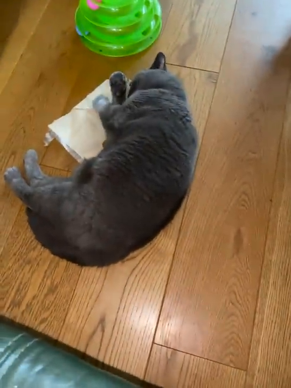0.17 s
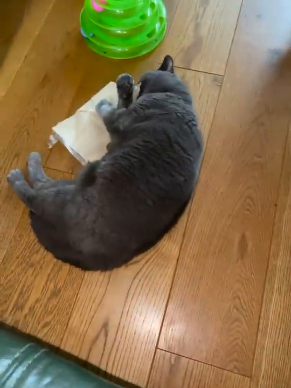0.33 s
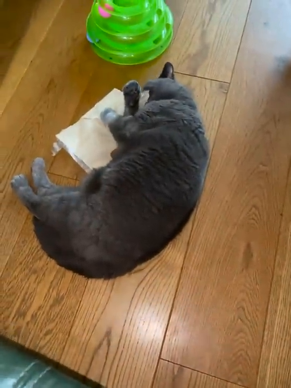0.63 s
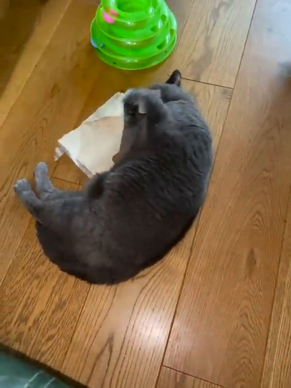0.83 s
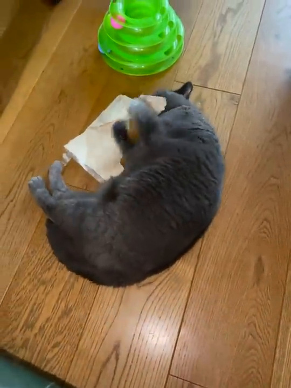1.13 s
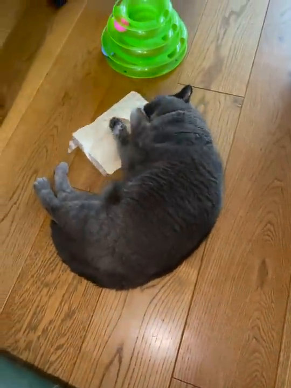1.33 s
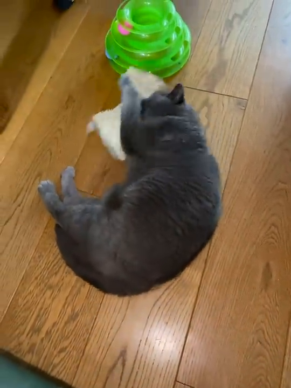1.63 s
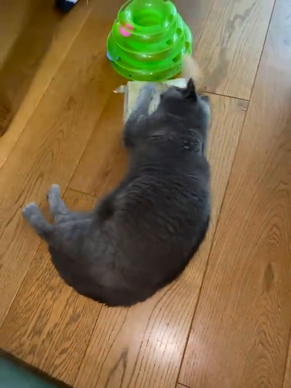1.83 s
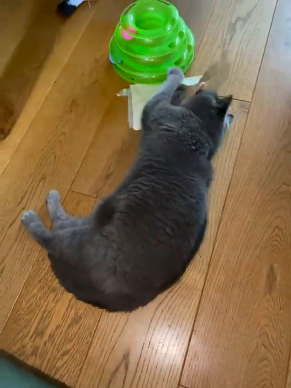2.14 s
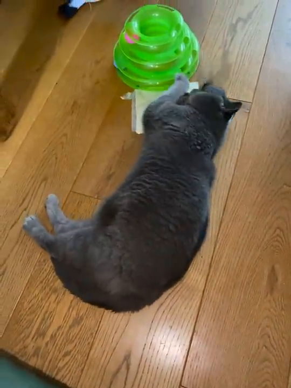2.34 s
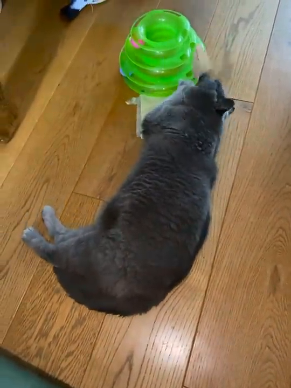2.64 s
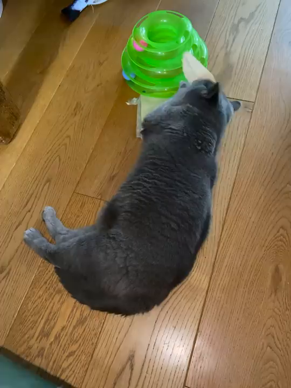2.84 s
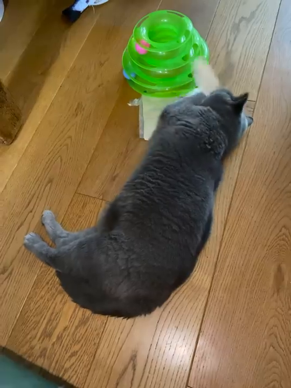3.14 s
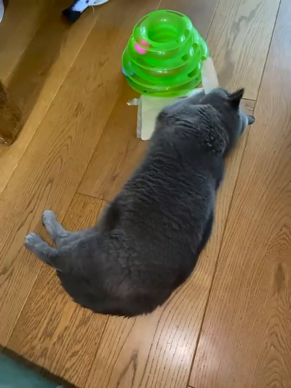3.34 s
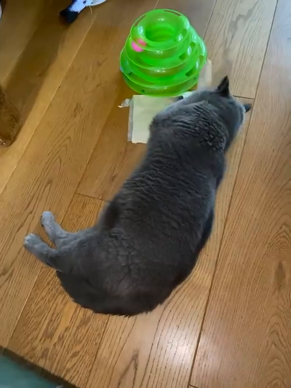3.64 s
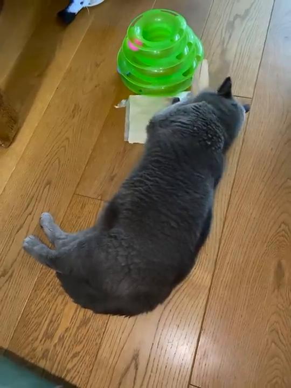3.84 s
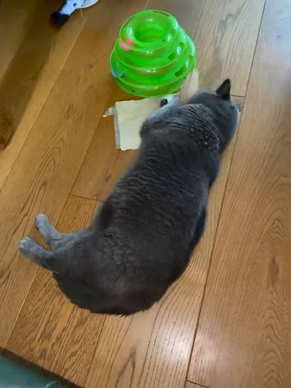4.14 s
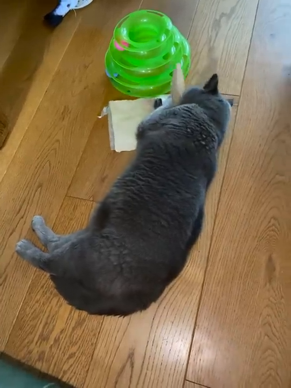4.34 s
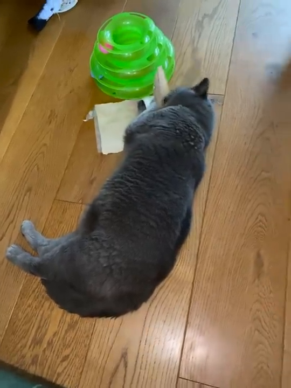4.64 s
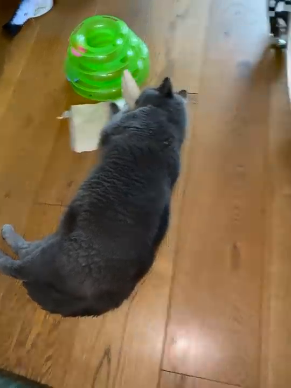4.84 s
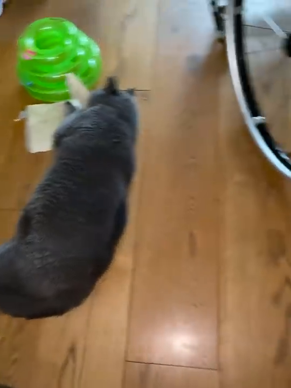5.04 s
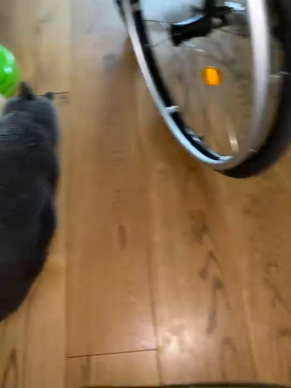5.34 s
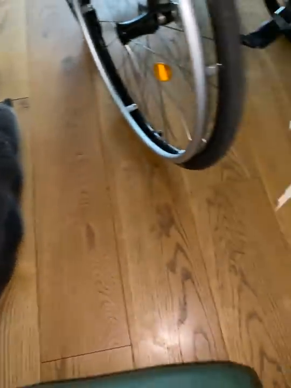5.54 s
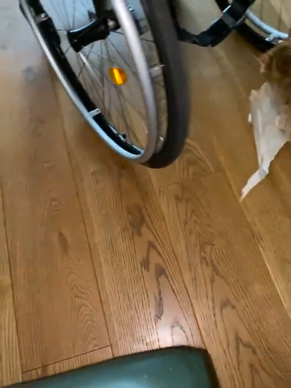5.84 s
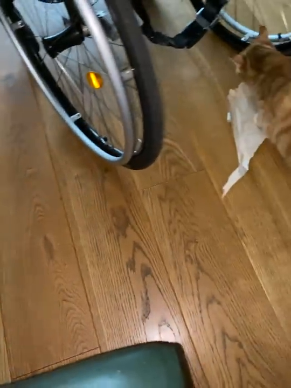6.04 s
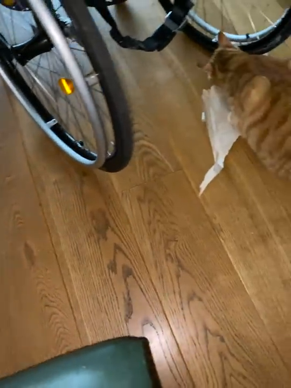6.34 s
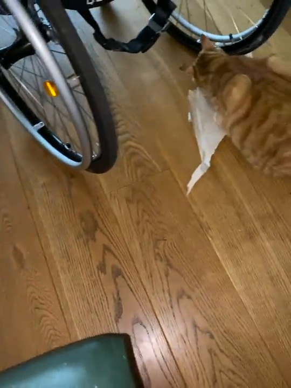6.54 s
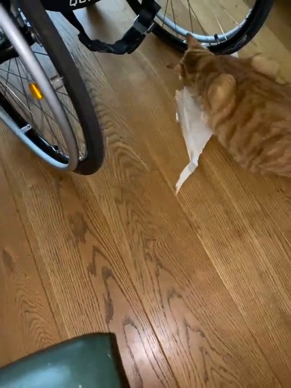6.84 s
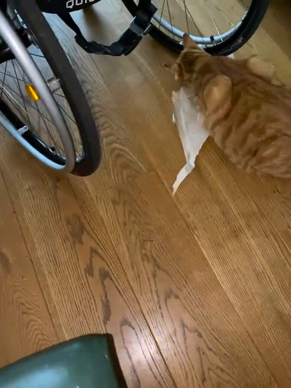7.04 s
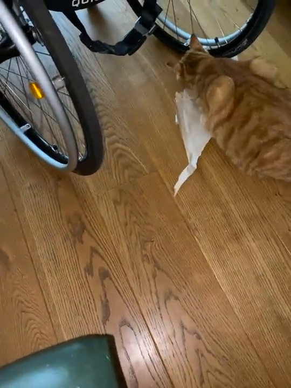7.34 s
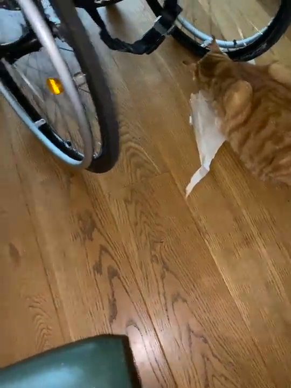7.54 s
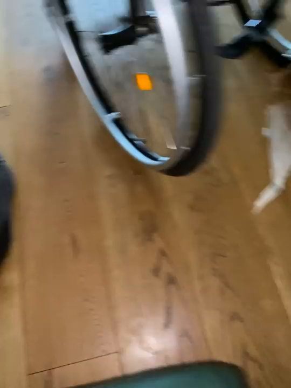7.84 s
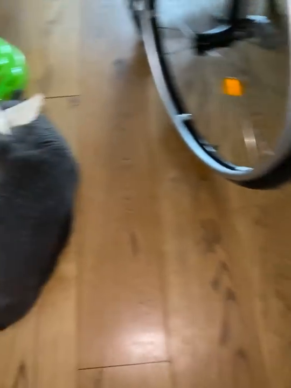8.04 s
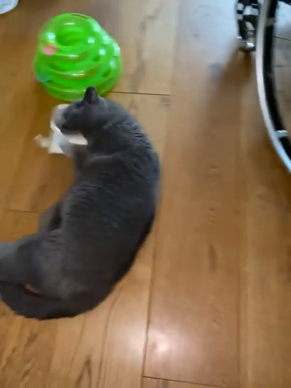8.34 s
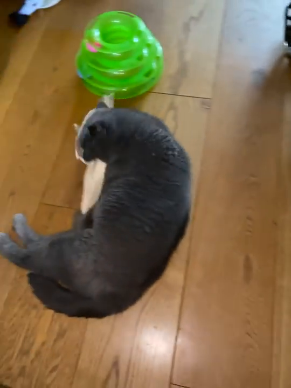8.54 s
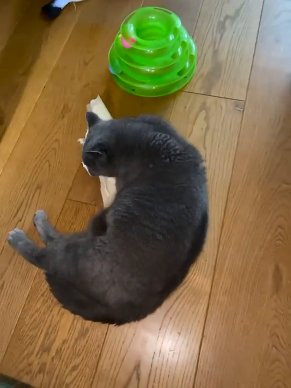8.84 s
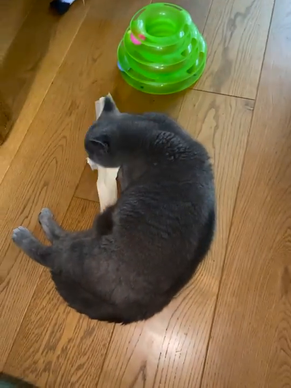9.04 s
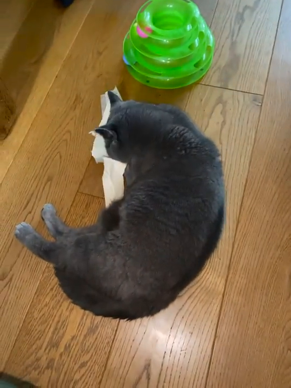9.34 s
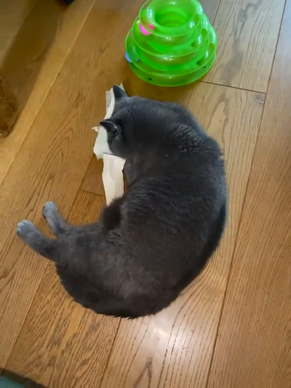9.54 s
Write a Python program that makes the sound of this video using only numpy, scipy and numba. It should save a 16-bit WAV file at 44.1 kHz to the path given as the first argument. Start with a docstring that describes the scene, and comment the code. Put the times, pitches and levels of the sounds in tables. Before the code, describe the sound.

A small, quiet furnished room with faint hiss, low hum and a barely audible high whine, heard by a phone near a cat playing with a paper envelope on a wooden floor. From 0 to 1.7 seconds, light irregular crinkles and silky fur-on-paper scuffs come and go. Around 1.8 to 3.3 the pawing becomes vigorous: crisp snaps, strong near 2.05 and 2.5, with hollow papery thumps. Rustling and scattered pops continue until about 5.1. Then it nearly stops, leaving room hiss and a small crackle or two near 6. From 6.6 bursts return, with sharp folds and a knock at 6.8, more snaps around 7.2, and dense crumpling from 7.7 to the loudest crack at 7.9. Swishing rustles and soft low thumps follow to 8.7, with a brief deep handling rumble near 8.6. Sparse crinkles and a few clear snaps around 9.6 finish it, with short dry room reflections.

```python
"""On the wooden floor of a small furnished room, a cat paws and rolls on a paper envelope near a phone.
The sheet rustles as swells of random tiny creases ring its panels, and the fur slides with a treble sheen.
Single folds snap as damped plate modes, the air pocket under the paper rings hollow, and thumps excite
low damped rings. Echoes and a decaying noise tail answer the paper; filtered noise makes the quiet hum,
whine and hiss, and one brief deep rumble from the hand on the phone."""
import sys
import numpy as np
from scipy import signal
from scipy.fft import rfft, irfft, next_fast_len
from scipy.io import wavfile
from scipy.ndimage import uniform_filter1d
from numba import njit

SR = 44100
rng = np.random.default_rng(int(sys.argv[2]) if len(sys.argv) > 2 else 0)


def wrap_up_sound(samples):
    """Save the sound to the file named by the first command line argument, as 16-bit audio."""
    columns = np.atleast_2d(samples).T
    # keep every value between -1 and 1, then stretch to whole-number steps
    tamed = np.clip(columns, -1, 1)
    steps = np.round(tamed * 32767).astype(np.int16)
    wavfile.write(sys.argv[1], SR, steps)


N = 427769  # length in samples


def undb(db):
    """Logarithmic level: 20 dB is a factor of ten in amplitude."""
    return 10 ** (np.asarray(db) / 20)


def level(x, db):
    """Mean power: scale x to an rms level in dB."""
    return x * undb(db) / np.sqrt(np.mean(x ** 2))


def colour(x, points):
    """Spectral shaping: apply (Hz, dB) gains, interpolated over log frequency."""
    hz, db = np.transpose(points)
    size = next_fast_len(len(x))
    f = np.fft.rfftfreq(size, 1 / SR) + 1  # the extra 1 Hz avoids log(0)
    gain = undb(np.interp(np.log(f), np.log(hz), db))
    return irfft(rfft(x, size) * gain, size)[:len(x)]


def ring(x, hz, width_hz):
    """Simple resonance: a damped mode with gain 1 at its centre."""
    b, a = signal.iirpeak(min(hz, .45 * SR), hz / width_hz, SR)
    return signal.lfilter(b, a, x)


@njit
def sweep(x, hz, sharpness):
    """Time-varying resonance: a state-variable band-pass whose centre moves."""
    y, band, low = np.empty(len(x)), 0., 0.
    for i in range(len(x)):
        g = np.tan(np.pi * hz[i] / SR)
        v = (band + g * (x[i] - low)) / (1 + g * (g + 1 / sharpness))
        band, low, y[i] = 2 * v - band, low + 2 * g * v, v / sharpness
    return y


def walk(rate):
    """Slow random modulation: levels drawn rate times a second and slewed, spread near 1."""
    hold = int(SR / rate)
    steps = np.repeat(rng.standard_normal(N // hold + 1), hold)
    return np.sqrt(1.5) * uniform_filter1d(steps, hold)[:N]


def curve(table):
    """Linear interpolation: columns of a (s, value, ..) table, sample by sample."""
    s, *columns = np.transpose(table)
    return [np.interp(np.arange(N) / SR, s, c) for c in columns]


def add(out, s, x):
    """Superposition: mix x in at time s."""
    i = int(s * SR)
    out[i:i + len(x)] += x[:N - i]


# Spectrum of the still air. Each row: frequency in Hz, relative density in dB per Hz.
AIR = [(15, -49), (28, -27), (80, 1.5), (149, 1.5), (229, 4), (863, 1), (3080, -11), (6050, -5),
       (13200, -18), (16000, -32)]
AIR_DB = -65.5  # rms of the shaped noise
# Hum and high whine. Each row: centre in Hz, width of each of two filter passes in Hz, level in dB rms.
HUM = [(99.3, 4.4, -77.5), (13400, 30, -86)]


def air():
    """Broadband and narrow-band noise: rumble and hiss flicker by octave; hum and whine waver."""
    white = np.zeros(N)
    for hz in 30 * 2. ** np.arange(10):
        octave = ring(rng.standard_normal(N), hz, 0.94 * hz) / np.sqrt(hz)
        white += undb(0.94 * walk(6)) * octave  # flicker spread in dB
    tones = np.zeros(N)
    for hz, width_hz, db in HUM:
        narrow = ring(ring(rng.standard_normal(N), hz, width_hz), hz, width_hz)
        tones += level(narrow, db)
    return level(colour(white, AIR), AIR_DB) + tones


# The hand on the phone. One row: peak in seconds, half length in seconds, centre in Hz,
# level in dB rms before the swell.
HAND = (8.6, .3, 90, -60)


def phone_hand():
    """Handling noise: turning the phone makes a deep noise band under a Gaussian swell."""
    s, length, hz, db = HAND
    swell = np.exp(-((np.arange(N) / SR - s) / length) ** 2)
    return swell * level(ring(rng.standard_normal(N), hz, .8 * hz), db)


# Floor and furniture reflections. Each row: delay in seconds, peak in dB re a tail of unit energy.
ECHOES = [(.0017, -10), (0.0122, -16), (0.0206, -19)]
# Reverberation time. Each row: frequency in Hz, time to fall 60 dB in seconds.
ROOM_T60 = [(200, 0.19), (1400, 0.16), (4000, 0.19), (10000, 0.11)]


def room():
    """Reverberation: discrete near echoes, then a diffuse tail that dies band by band."""
    t = np.arange(SR // 2) / SR
    hz, t60 = np.transpose(ROOM_T60)
    tail = np.zeros(len(t))
    for f in 125 * 2. ** np.arange(8):
        decay = 1000. ** (-t / np.interp(np.log(f), np.log(hz), t60))
        tail += ring(rng.standard_normal(len(t)), f, f) / np.sqrt(f) * decay
    # a quick onset, then slightly stronger early sound from near surfaces
    tail *= (1 - np.exp(-t / 0.00038)) * (1 + 0.2 * np.exp(-t / 0.079))
    out = tail / np.sqrt(np.sum(tail ** 2))
    for s, db in ECHOES:
        out[int(s * SR)] += undb(db)
    return out


# Modes of the trapped air. Each row: centre in Hz, width in Hz (each of two passes is twice as wide),
# gain in dB.
POCKET = [(535, 95, 0), (800, 350, -12)]


def pocket(x):
    """Cavity resonance: the air trapped under the envelope rings hollow."""
    return sum(undb(db) * ring(ring(x, hz, 2 * w), hz, 2 * w) for hz, w, db in POCKET)


# Body and paws landing on the boards or the puffed envelope.
# Each row: start in seconds, peak in dB, pitch in Hz.
THUMPS = [(1.04, -47, 170), (1.085, -50, 930), (1.83, -45, 420), (2.058, -27, 552), (2.214, -46, 334),
          (2.374, -39.5, 549), (2.814, -39, 550), (3.13, -35.5, 380), (5.07, -40.5, 468), (6.795, -38, 520),
          (6.806, -31, 511), (7.15, -42, 450), (8.125, -48.5, 260), (8.185, -43, 330), (8.305, -41, 400),
          (8.43, -43.5, 423), (8.545, -45, 200), (8.704, -38, 235), (8.734, -37, 229)]


def thumps():
    """Impact excitation: a soft half-cycle push drives a damped low ring and the pocket."""
    out, t = np.zeros(N), np.arange(SR // 8) / SR
    for s, peak_db, hz in THUMPS:
        push = np.sin(2 * np.pi * hz * t) * (t < .5 / hz)
        push += .4 * rng.standard_normal(len(t)) * np.exp(-t / .02)  # weight settles raggedly
        boards = ring(ring(push, hz, .6 * hz), hz, 0.76 * hz)
        knock = boards + 1.27 * pocket(push)
        add(out, s, undb(peak_db) * knock / np.abs(knock).max())
    return out


# Folds that snap. Each row: start in seconds, peak of the panel ring in dB, panel pitch in Hz,
# crack in dB re that peak, share sent to the room in dB re the direct sound.
SNAPS = [(0.117, -33, 2900, -45, -1), (0.137, -31, 3000, -35, -8), (0.488, -40, 4800, -35, -8),
         (0.622, -41, 4800, -31, -0.5), (1.754, -33, 3140, -21, -18), (1.83, -23, 3260, -25, -7.5),
         (1.912, -27.5, 4930, -33, -18), (2.058, -17, 1500, -24, 1), (2.216, -39, 2110, -30, 3.5),
         (2.338, -27.5, 2510, -23, -1), (2.371, -32.5, 2070, -22, 3.5), (2.453, -52, 2790, 7, -10),
         (2.485, -16, 3400, -15, -1), (2.814, -24, 2800, -20, 0), (2.89, -33, 1430, -34, -8),
         (2.959, -29, 2200, -27, 5), (3.074, -19.5, 3870, -26, -10), (3.117, -26, 2430, -32, 8),
         (3.139, -20, 2500, -34, -1), (3.277, -32, 3330, -33, -10), (3.527, -22.5, 3400, -22, -2.5),
         (3.667, -36, 2600, -30, -5), (3.9, -38, 2400, -30, -8), (4.005, -25, 3220, -36, -5),
         (4.103, -30, 1850, -30, -0.5), (4.374, -35, 1540, -18, -3), (4.422, -33, 1380, -9, -3),
         (4.852, -35, 2600, -22, -5), (5.073, -41.5, 1940, -23, 2), (5.928, -27.5, 3700, -45, 0),
         (6.045, -38, 1510, -26, -4), (6.795, -32, 3600, -8, -5), (6.808, -21, 3000, -16, -3),
         (6.887, -34, 1800, -32, -6), (7.128, -27, 3000, -20, 7), (7.181, -20.5, 4730, -19.5, -2),
         (7.188, -23.5, 4700, -27, 4), (7.23, -32.5, 1220, -23, -4.5), (7.497, -40.5, 2140, -32, 3.5),
         (7.611, -31, 1700, -25, -3), (7.651, -32, 1610, -23, 1), (7.737, -25, 1380, -49, -26),
         (7.755, -25, 1800, -43, -21), (7.81, -32, 1000, -9, -2.5), (7.845, -27, 2200, -29, -2),
         (7.921, -9.5, 3000, -13, -8), (8.053, -37, 3400, -20, -12), (8.065, -30, 2200, -40, -8),
         (8.181, -17.5, 2730, -32, -7), (8.309, -27, 1700, -25, -8.5), (8.505, -23, 2600, -35, -12.5),
         (8.568, -33.5, 1160, -27, 1), (8.575, -36, 2960, -1, 3), (8.587, -22.5, 3360, -37, 5),
         (8.62, -22, 2620, -42, -1), (8.861, -32, 1000, -34, -13), (9.258, -35, 1480, -28, -7.5),
         (9.402, -38.5, 2900, -23, 4), (9.609, -19.5, 2900, -36, -3.5), (9.687, -26, 1200, -39, -6)]
# Modes of a folded panel. Each row: multiple of panel pitch (before random detuning),
# width as a share of panel pitch, gain in dB.
FOLD_MODES = [(.5, .25, -8), (1, .45, 0), (1.5, .4, -7), (1.9, .5, -7)]
FOLD_POCKET_DB = -42.5  # pocket re the panel peak


def snaps():
    """Snap-through buckling: a flipping fold rings its panel, cracks in the treble and pumps the pocket.
    Row 0 reaches the phone, row 1 the room: a fold shielded by the cat is heard more through the walls."""
    out, t = np.zeros((2, N)), np.arange(SR // 16) / SR
    treble = signal.butter(2, 5000, "high", fs=SR, output="sos")
    for s, peak_db, hz, crack_db, room_db in SNAPS:
        burst = rng.standard_normal(len(t)) * (.25 * np.exp(-t / .0012) + .04 * np.exp(-t / .004))
        burst[0] = 2  # a clean flip, then a shudder
        panel = np.zeros(len(t))
        for ratio, share, db in FOLD_MODES:
            mode_hz = ratio * hz * (1 + .06 * rng.standard_normal())
            panel += undb(db) * ring(burst, mode_hz, share * hz)
        damping = signal.butter(2, min(2.39 * hz, 9000), fs=SR, output="sos")
        panel = signal.sosfilt(damping, panel)  # paper damps its upper modes
        short = slice(SR // 250)  # crack and pocket are rated by their first 4 ms
        crack, hollow = signal.sosfilt(treble, burst), pocket(burst)
        fold = panel / np.abs(panel).max()
        fold += undb(crack_db) * crack / crack[short].std()
        fold += undb(FOLD_POCKET_DB) * hollow / hollow[short].std()
        add(out[0], s, undb(peak_db) * fold)
        add(out[1], s, undb(peak_db + room_db) * fold)
    return out


def creases(rate, spread_db):
    """Random impulse process: tiny buckles, many faint and few strong, at slightly patchy strength."""
    chance = rng.random((N, 2)).T
    strength_db = np.minimum(-spread_db * np.log(1 - chance[1]), 12)
    size = undb(strength_db + 2.2 * walk(70))
    return (chance[0] < rate / SR) * size * rng.standard_normal(N)


# Strokes of paw or body on the paper. Each row: peak in seconds, creasing's rise in seconds per 10 dB,
# its fall in seconds per 10 dB, creasing in dB, panel band in Hz, fur sliding in dB.
STROKES = [(0.0, .01, .045, -58, 2460, -77), (.11, .004, .07, -45, 3100, -64),
           (.27, .05, .06, -64, 3400, -62), (.37, .01, .07, -48, 3400, -50),
           (.55, .15, .04, -56, 4000, -56), (.63, .03, .04, -57, 4100, -65),
           (1.09, .07, .08, -56, 3300, -58), (1.21, .12, .05, -50, 3300, -51),
           (1.29, .04, .05, -58, 3600, -55), (1.39, .1, .09, -54, 4800, -53),
           (1.59, .025, .14, -48, 3900, -46), (1.76, .08, .15, -52, 4200, -49),
           (1.91, .15, .03, -56, 4200, -55), (2.01, .04, .03, -54, 2700, -62),
           (2.13, .055, .08, -53, 1700, -56), (2.25, .05, .08, -54, 3100, -56),
           (2.31, .06, .08, -62, 4270, -50), (2.43, .08, .15, -51, 3000, -56),
           (2.55, .15, .07, -52, 2550, -50), (2.69, .05, .06, -55, 2400, -57),
           (2.97, .05, .05, -52, 3000, -50), (3.02, .06, .02, -45, 2900, -55),
           (3.08, .03, .025, -54, 3100, -60), (3.145, .03, .05, -51, 2600, -43),
           (3.29, .04, .05, -56, 2680, -58), (3.45, .08, .12, -53, 3400, -52),
           (3.59, .15, .05, -58, 3000, -60), (3.68, .035, .035, -54, 2700, -60),
           (3.73, .02, .09, -54, 3400, -52), (4.04, .03, .065, -48, 3600, -51),
           (4.3, .2, .1, -63, 2300, -66), (4.42, .04, .035, -44, 2120, -48),
           (4.58, .12, .08, -57, 2600, -62), (4.78, .02, .1, -52, 2970, -57),
           (4.85, .05, .055, -48, 3130, -49), (5.0, .05, .08, -48, 2710, -54),
           (5.68, .05, .05, -66, 2600, -80), (6.63, .05, .036, -50, 2980, -58),
           (6.75, .03, .07, -54, 2700, -65), (6.81, .02, .06, -46, 2200, -43),
           (7.04, .2, .07, -48, 2700, -53), (7.15, .06, .12, -50, 2560, -68),
           (7.39, .04, .04, -64, 3300, -58), (7.75, .02, .08, -43, 2570, -53),
           (7.81, .03, .05, -42, 2350, -49), (7.62, .01, .08, -57, 2500, -55),
           (7.98, .1, .07, -52, 3700, -49), (8.06, .03, .1, -66, 2600, -58),
           (8.32, .09, .08, -49, 3700, -41), (8.42, .03, .07, -53, 3700, -51),
           (8.59, .035, .09, -44, 2900, -45), (8.97, .3, .1, -62, 3300, -66),
           (9.07, .015, .06, -58, 3600, -60), (9.2, .04, .14, -64, 4000, -59),
           (9.44, .04, .035, -59, 3700, -52), (9.65, .04, .1, -58, 2700, -60),
           (9.7, .03, .05, -52, 1700, -66)]
# Faint settling of the paper between strokes.
# Each row: time in seconds, creasing in dB, fur sliding in dB.
SETTLE = [(0, -76, -78), (.2, -65, -67), (1.1, -66, -64), (1.5, -66, -63), (1.95, -66, -67),
          (2.6, -65, -64), (3.3, -66, -67), (4.6, -66, -65), (5.05, -66, -70), (5.3, -73, -80),
          (5.8, -73, -77), (6.0, -72, -72), (6.5, -75, -71), (7.4, -65, -66), (7.7, -60, -64),
          (8, -64, -65), (9.7, -69, -72)]
SETTLE_HZ = 3300  # panel band of the settling
FUR_STEEP = 1.2  # the fur starts and stops more sharply than the creasing


def strokes():
    """Power summation: strokes swell and fade; the panel band is their power-weighted mean."""
    t = np.arange(0, N + 64, 64) / SR  # one point per 64 samples
    s, *columns = np.transpose(SETTLE)
    body, fur = (undb(2 * np.interp(t, s, db)) for db in columns)  # doubled dB gives power
    band = body * SETTLE_HZ
    for s, rise_s, fall_s, body_db, hz, fur_db in STROKES:
        drop_db = 10 * np.where(t < s, (s - t) / rise_s, (t - s) / fall_s)
        power = undb(2 * (body_db - drop_db))
        body, band = body + power, band + hz * power
        fur = fur + undb(2 * (fur_db - FUR_STEEP * drop_db))
    outlines = np.sqrt(body), band / body, np.sqrt(fur)
    return [np.interp(np.arange(N) / SR, t, c) for c in outlines]


# Spectral weighting of the creasing sheet. Each row: frequency in Hz, relative gain in dB.
SHEET = [(500, 1), (900, 7.5), (1500, 4), (3000, 1), (5000, 2), (7000, -3.5), (10000, -17)]
# Spectral weighting of the sliding fur. Each row: frequency in Hz, relative gain in dB.
SHEEN = [(3500, -20), (6000, 2.5), (9000, 5.5), (13000, 3.5), (16000, 0)]
# The air pocket, loud while the envelope is puffed up.
# Each row: time in seconds, level in dB during an ordinary stroke.
HOLLOW = [(0, -76), (1.9, -78), (2.1, -67), (2.9, -64), (3.9, -61), (4.4, -63), (4.65, -59), (5.1, -62),
          (5.25, -70), (6.45, -70), (6.6, -59), (6.85, -59), (7.0, -68), (7.2, -62), (8.05, -74),
          (8.3, -64), (8.6, -63), (8.8, -68), (9.7, -72)]
ORDINARY_DB, POCKET_FOLLOWS = -56, .6  # ordinary creasing; dB of pocket hum per dB of creasing
PANELS, PANEL_WANDER_OCT, PANEL_SHARP = 4, 0.4, 2.4  # count, drift spread in octaves, resonance Q


def rustle():
    """Crackling noise: random creases excite drifting panels, the sliding fur and the pocket."""
    creasing, hz, fur = strokes()
    hollow_db, = curve(HOLLOW)
    shared = creases(7000, spread_db=2.5)
    which = rng.integers(PANELS, size=N)
    rings = np.zeros(N)
    for k in range(PANELS):
        # each panel's band drifts at random around the stroke's band
        panel_hz = np.minimum(hz * 2 ** (PANEL_WANDER_OCT * walk(15)), SR / 4)
        rings += sweep(shared * (which == k), panel_hz, PANEL_SHARP)
    body = level(colour(rings + 0.17 * shared, SHEET) / np.sqrt(hz), 0)
    sheen = level(colour(.5 * shared + creases(12000, spread_db=1.5), SHEEN), 0)
    hollow = level(pocket(creases(2500, spread_db=2.5)), 0)
    pocket_gain = undb(hollow_db) * (creasing / undb(ORDINARY_DB)) ** POCKET_FOLLOWS
    return creasing * body + fur * sheen + pocket_gain * hollow


RUSTLE_ROOM_DB = -12  # rustle sent to the room, re its direct sound


def scene():
    """Superposition: paper and its room answer, thumps and handling over the still air."""
    paper = rustle()
    folds, to_room = snaps()
    walls = signal.fftconvolve(undb(RUSTLE_ROOM_DB) * paper + to_room, room())[:N]
    return (paper + folds + walls + thumps() + phone_hand() + air())[None]


TOP_HZ = 15800  # upper edge of the phone's band


def record(dry):
    """Band limiting: the phone drops the deepest bass and cuts the top."""
    dry = signal.sosfilt(signal.butter(2, 50, "high", fs=SR, output="sos"), dry)
    return signal.sosfilt(signal.ellip(10, .2, 60, TOP_HZ, fs=SR, output="sos"), dry)


dry = scene()
out = record(dry)
wrap_up_sound(out)
```